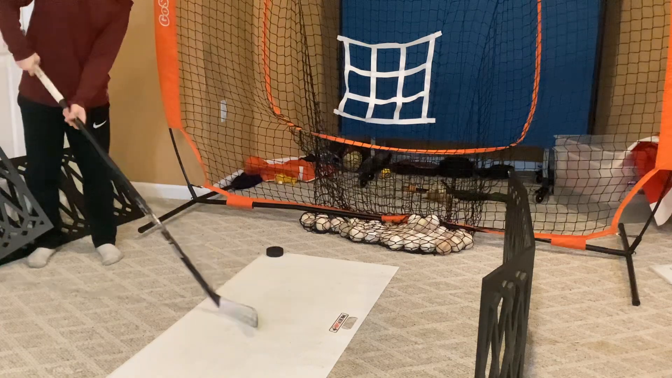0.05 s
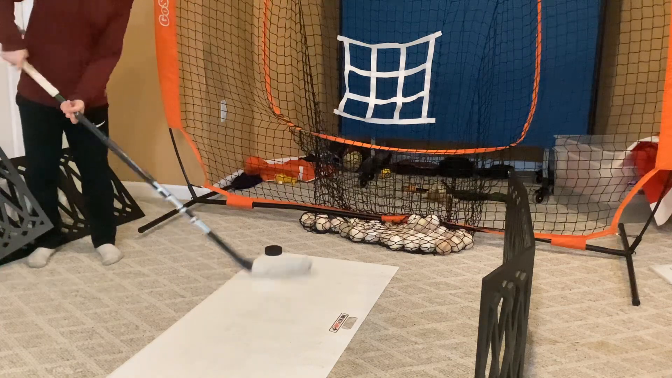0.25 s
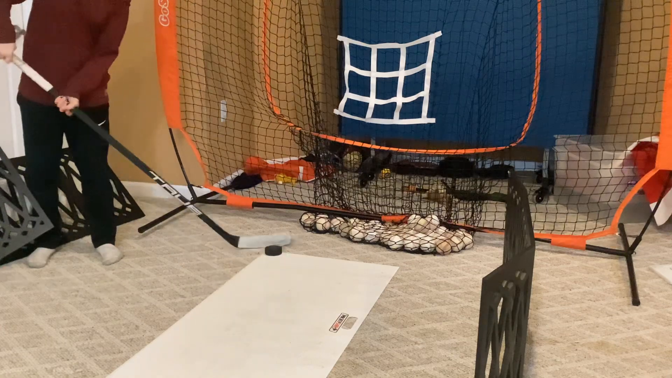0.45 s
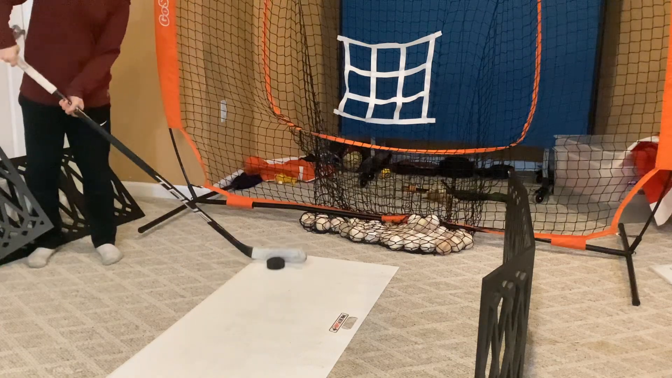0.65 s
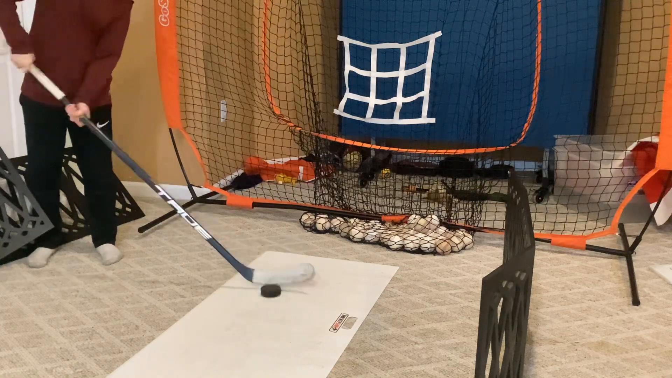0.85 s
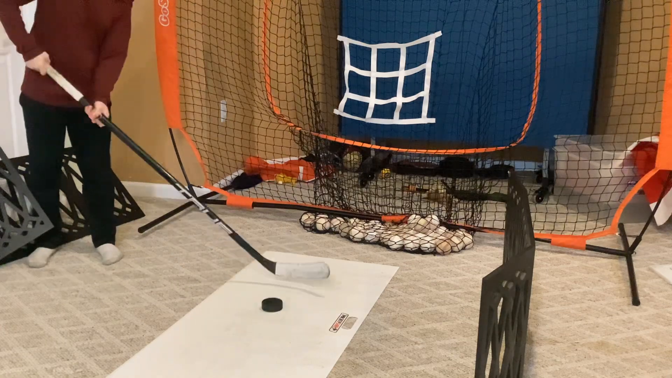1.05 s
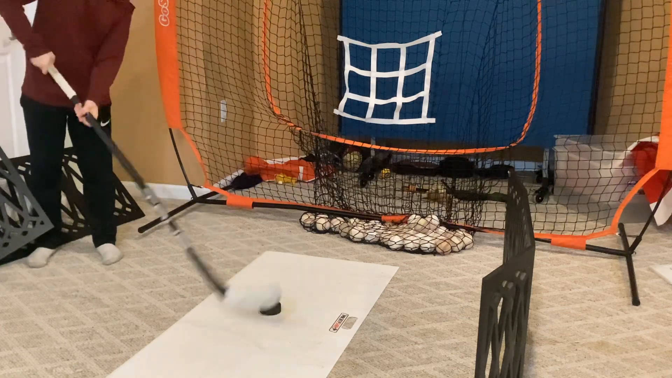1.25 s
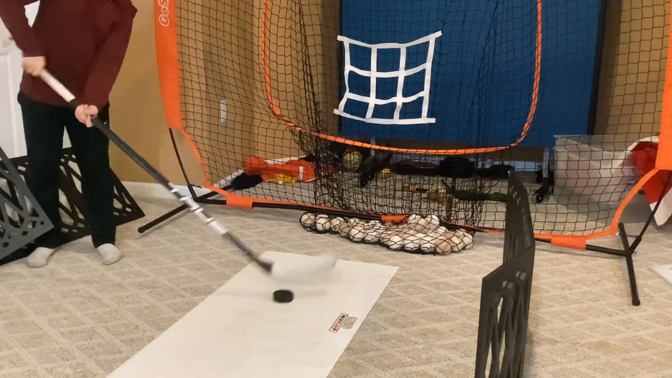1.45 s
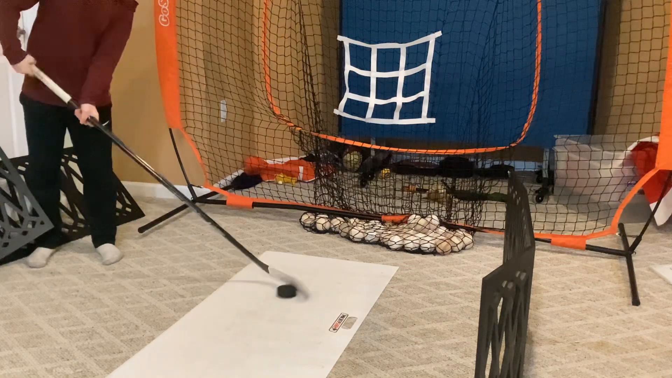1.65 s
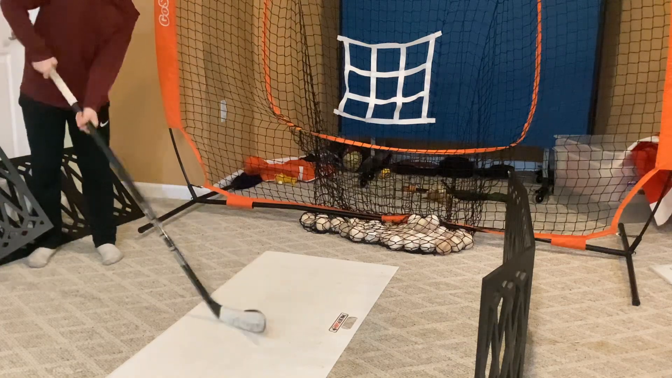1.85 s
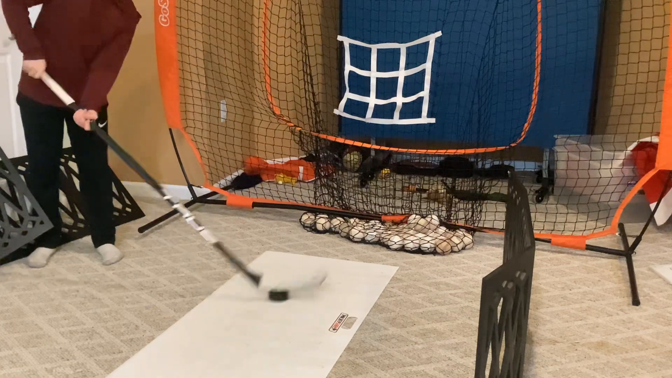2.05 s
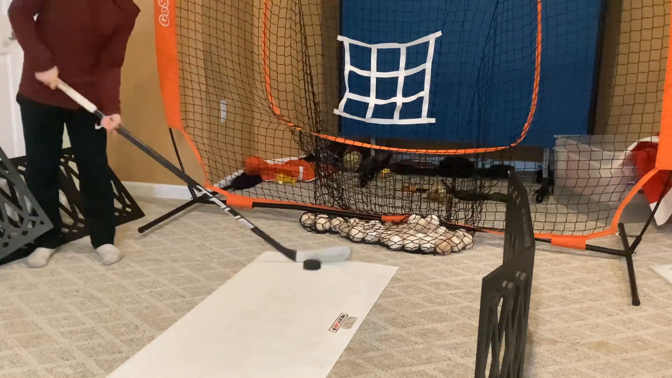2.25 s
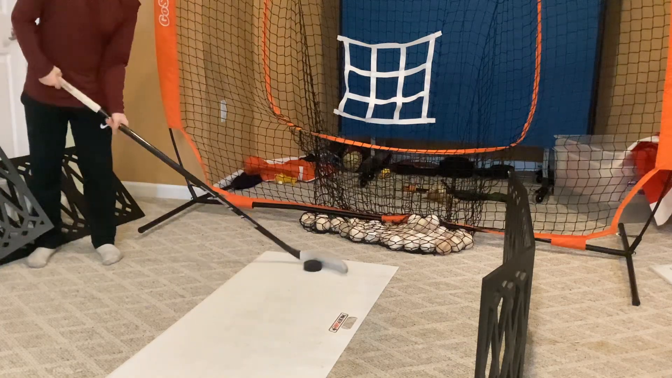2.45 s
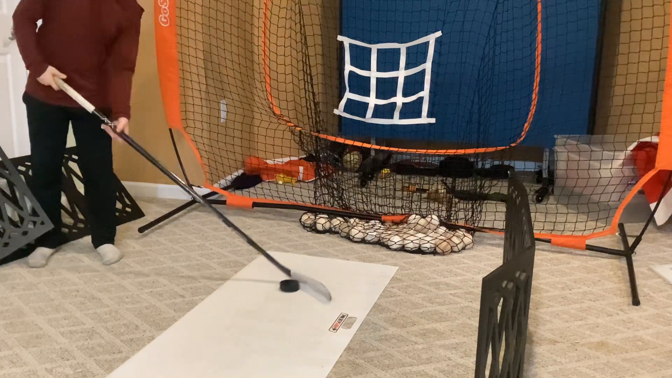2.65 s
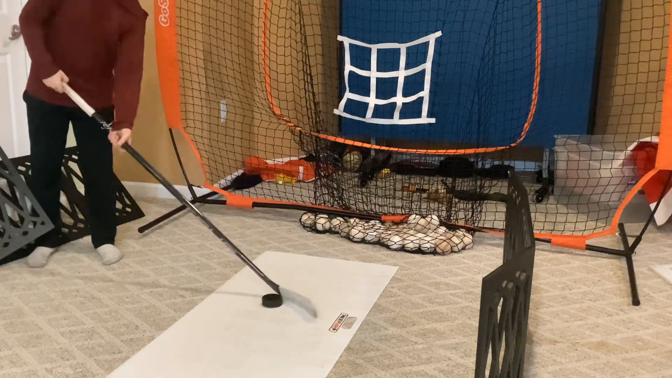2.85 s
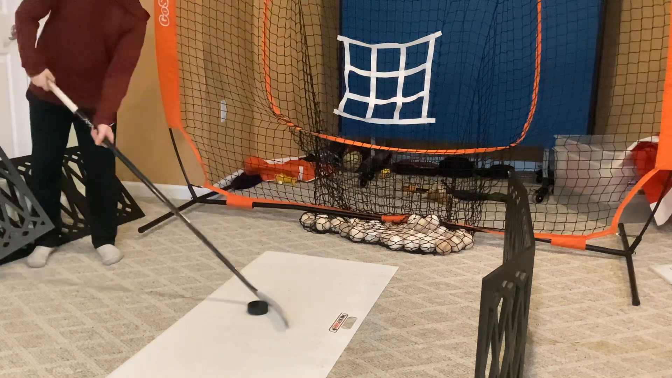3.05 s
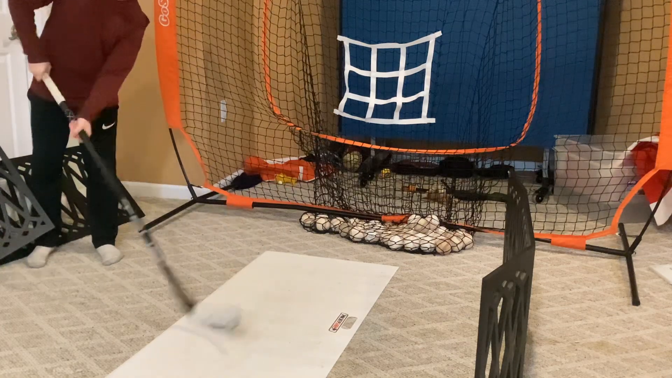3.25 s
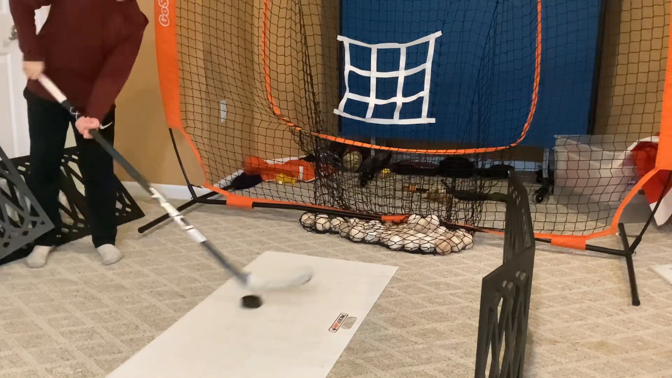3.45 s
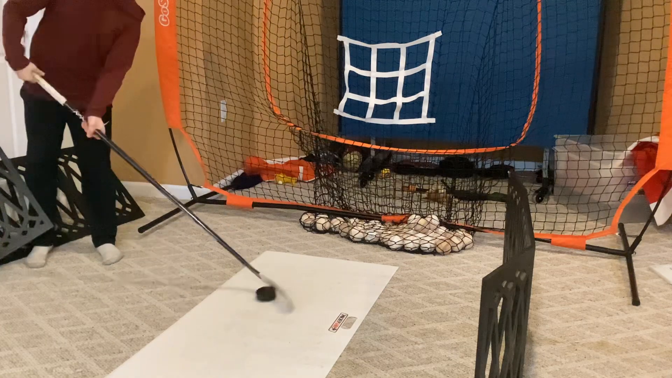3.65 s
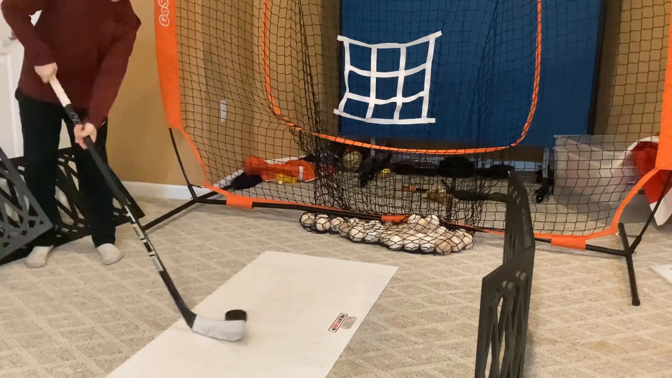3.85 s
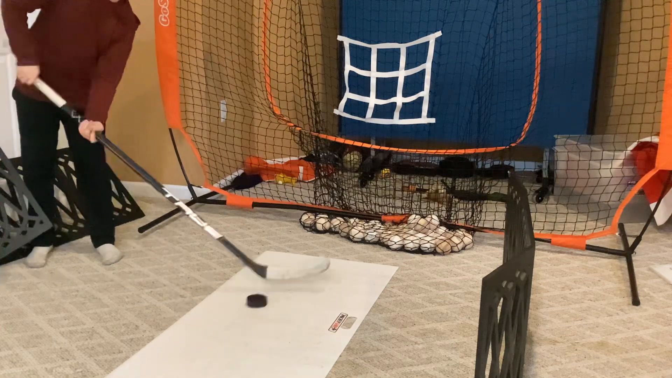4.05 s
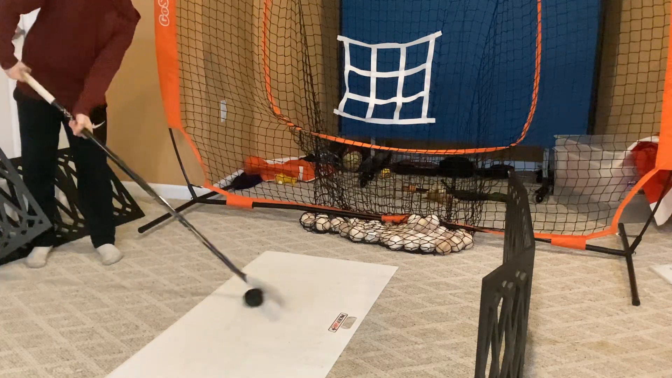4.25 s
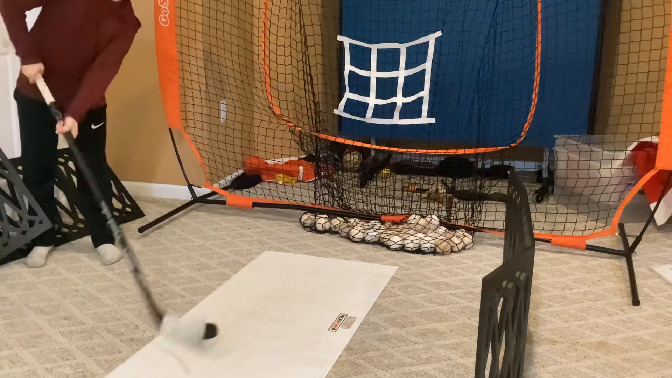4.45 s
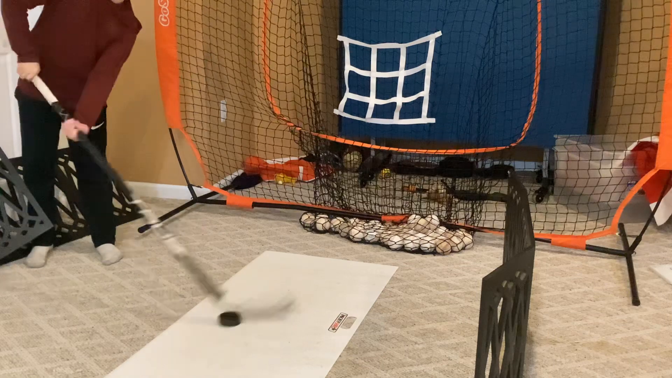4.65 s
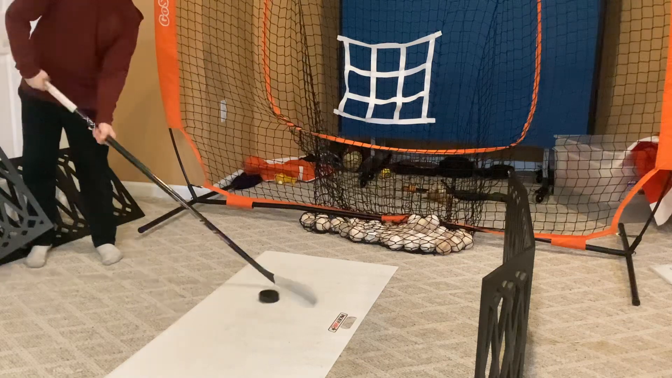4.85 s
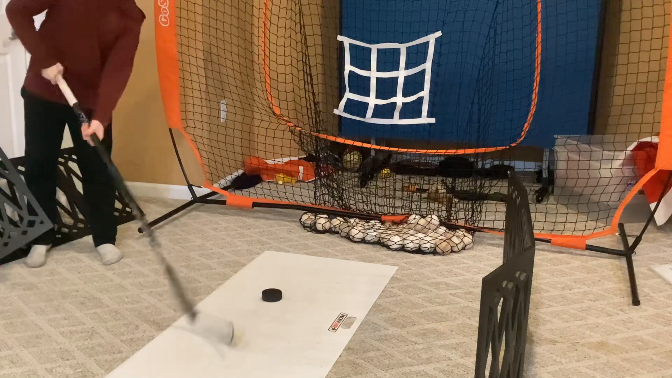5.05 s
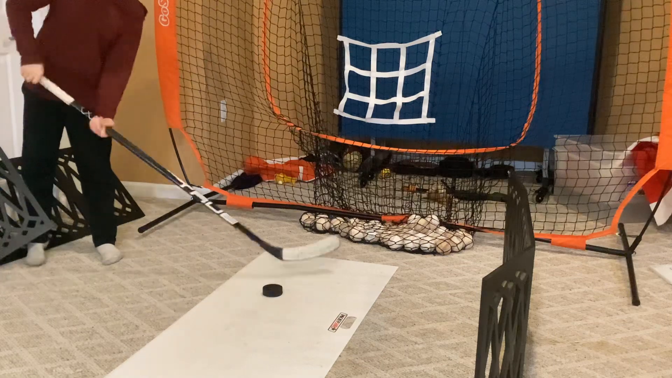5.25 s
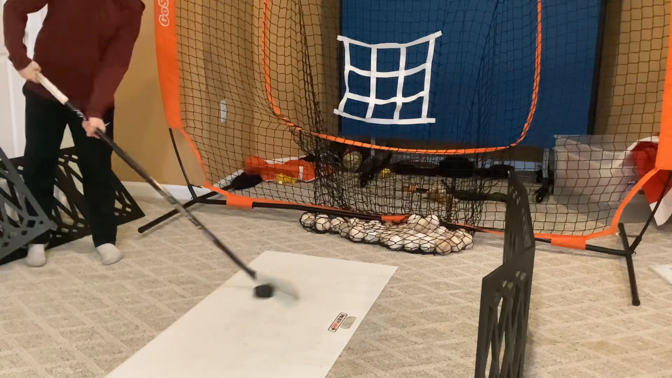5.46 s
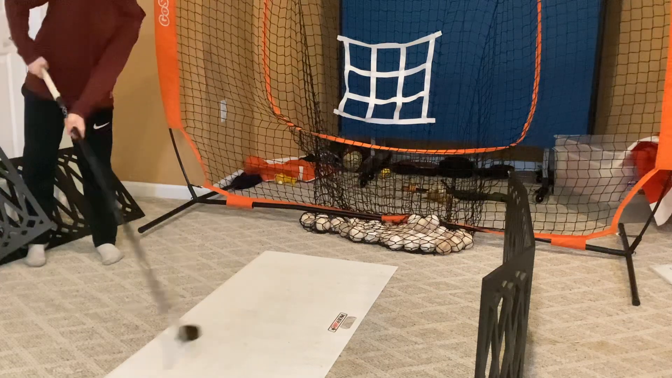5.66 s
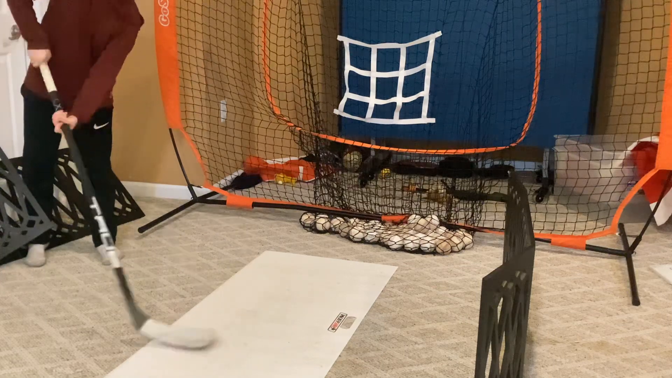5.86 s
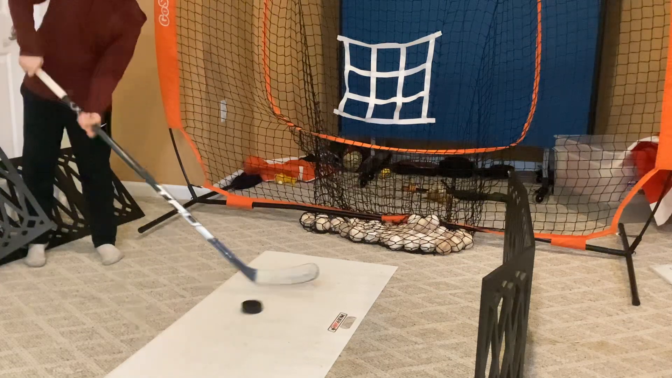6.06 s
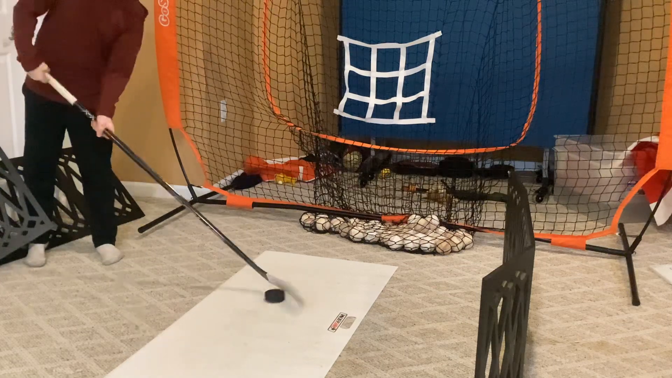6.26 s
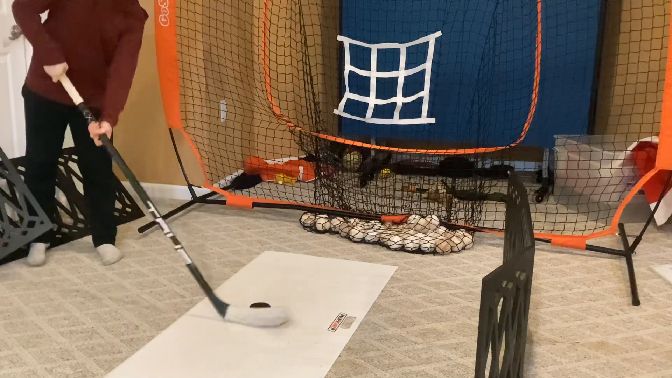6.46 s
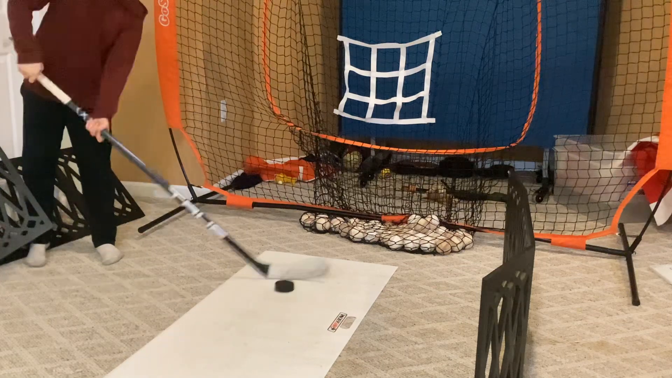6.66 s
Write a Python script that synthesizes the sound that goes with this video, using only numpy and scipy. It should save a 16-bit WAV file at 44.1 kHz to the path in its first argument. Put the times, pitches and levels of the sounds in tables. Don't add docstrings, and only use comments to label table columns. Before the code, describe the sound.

Hard, dry clacks of a stick blade on plastic alternate with woody knocks of a puck, each with a short low floor boom. The first second is sparse, a flurry follows, then a quieter stretch of scrapes and rasps, then fast irregular hitting until the end. Dull foot thuds on carpet and a very faint house hum sit behind, in a close, lively little room heard from two metres.

```python
import sys
import numpy as np
from scipy import signal
from scipy.fft import rfft, irfft, next_fast_len
from scipy.io import wavfile
from scipy.ndimage import uniform_filter1d

SR = 44100
rng = np.random.default_rng(int(sys.argv[2]) if len(sys.argv) > 2 else 0)


def materialize(psi):
    bounded = np.clip(np.atleast_2d(psi).T, -1, 1)
    quanta = np.round(bounded * 32767).astype(np.int16)
    wavfile.write(sys.argv[1], SR, quanta)


def convert_level_to_amplitude(level_db):
    exponent = np.asarray(level_db, float) / 20
    return 10 ** exponent


N = 295470

# [t/s, force/dB, edge level/dB, blade ring/dB, floor boom/dB]
HEEL_KNOCKS = [
    (1.42, -11.5, -18, -13, -25),
    (2.302, -11.5, -26, -23.5, -30.5),
    (5.217, -15, -26.5, -22, -20),
    (5.453, -5, -17, -16.5, -18),
    (6.517, -11, -25, -18, -20.5),
]
MIDDLE_KNOCKS = [
    (3.582, -1.5, -18.5, -15, -24),
    (4.201, -8, -18.5, -10.5, -20),
    (4.553, -14, -18.5, -15.5, -28),
    (6.242, -9, -15.5, -15, -19),
]
TOE_KNOCKS = [
    (0.537, -17.5, -31, -25, -38),
    (1.584, -6, -10.5, -5, -35),
    (3.366, -15, -21, -16.5, -22),
    (3.945, -10, -22, -21, -21),
    (4.918, -11.5, -22.5, -21, -21),
]
# [f/Hz, level/dB]
BLADE_EDGE = [(800, -52.5), (1800, 4.5), (2400, 5.5), (4400, 2.5), (5500, 3), (8000, 2.5), (11000, -4.5),
              (16000, -30.5)]


def evened(x):
    return x / np.sqrt(np.mean(x ** 2) + 1e-20)


def read(points, hz):
    f, value = np.transpose(points)
    return np.interp(np.log(hz + 1), np.log(f + 1), value)


def add(mix, s, sound):
    part = mix[round(s * SR):][:len(sound)]
    part += sound[:len(part)]


def colour(x, points):
    size = next_fast_len(N + SR)
    gain = convert_level_to_amplitude(read(points, np.fft.rfftfreq(size, 1 / SR)))
    return irfft(rfft(x, size) * gain, size)[..., :N]


def click(spectrum):
    log_gain = np.log(convert_level_to_amplitude(read(spectrum, abs(np.fft.fftfreq(2048, 1 / SR)))))
    pulse = np.fft.ifft(np.exp(np.conj(signal.hilbert(log_gain)))).real[:1024]
    return pulse / abs(pulse).max()


def ring(modes, hz_scale, rise_s, chance, spread_db=0, spread=0):
    t = np.arange(0, max(mode[2] for mode in modes), 1 / SR)
    tones = np.zeros(len(t))
    for (f, db, t60), c in zip(modes, chance):
        level_db = db + spread_db * (c * 7 % 1 - 0.5)
        hz = f * hz_scale * (1 + spread * (c * 13 % 1 - 0.5))
        tones += convert_level_to_amplitude(level_db - 60 * t / t60) * np.sin(2 * np.pi * (hz * t + c))
    return tones * (1 - np.exp(-t / rise_s)) ** 2


def noise(spectrum, patchy_db):
    hz = np.fft.rfftfreq(512, 1 / SR)
    a, b, patches = rng.standard_normal((N // 128 + 5, 257, 3)).T
    patches = uniform_filter1d(patches, size=8, axis=0)
    patches = evened(uniform_filter1d(patches, size=14, axis=1))
    z = (a + 1j * b) * convert_level_to_amplitude(read(spectrum, hz)[:, None] + patchy_db * patches)
    return evened(signal.istft(z, nperseg=512, noverlap=384)[1][:N])


def slap_blows():
    # [t/s, force/dB, trapped air/dB, floor boom/dB]
    flat_landings = [(0.137, -28, -41, -45), (0.934, -15, -22.5, -34), (1.345, -3, -8.5, -21.5),
                     (1.5555, -3, -8, -17.5), (1.881, -6, -11.5, -21.5), (2.195, -9, -14, -26.5),
                     (3.313, -8, -13.5, -22), (3.529, -5, -9.5, -19), (3.862, -9, -13.5, -21.5),
                     (4.124, -5.5, -8.5, -19), (4.516, -7.5, -12.5, -22), (4.789, -5.5, -9.5, -20.5),
                     (5.097, -8, -12.5, -22.5), (5.338, -6.5, -9, -21.5), (5.723, -8.5, -12, -27.5),
                     (6.119, -8, -10.5, -23), (6.428, -5, -7, -19.5), (6.691, -1.5, -7.5, -19)]
    # [f/Hz, level/dB, t60/s]
    contact = [(45, -14, 0.041), (565, 2.5, 0.014), (1180, -25.5, 0.023), (2153, 9.5, 0.0037)]
    flat_hz = 1055
    rows = [(s, db, (db + air) / 2 - 10.5, air, db, boom, flat_hz) for s, db, air, boom in flat_landings]
    return blows(rows, contact, BLADE_EDGE, contact_s=0.00005, squeeze_s=0.0001,
                 click_db=-16.0, body_db=-3.5, edge_db=17, snap_db=-12.5, air_db=20, spill_db=15.0,
                 blade_db=-21.5, boom_db=-1.0, boom_rise_s=0.0026)


def knock_blows():
    # [t/s, edge level/dB, blade ring/dB, floor boom/dB]
    brushes = [(0.399, -41, -38, -80), (0.445, -49, -52, -43.5), (0.721, -58, -39, -50),
               (0.775, -54, -43, -33), (0.796, -39, -31.5, -30.5), (2.403, -42, -67, -86),
               (2.463, -45, -44, -46), (2.476, -35.5, -51, -57), (2.518, -38.5, -62, -62),
               (2.588, -41.5, -48, -46), (2.775, -79, -42, -73), (4.169, -38, -32, -28),
               (4.434, -49, -41, -32), (5.165, -69, -30, -50), (6.29, -36, -36, -27.5)]
    # [f/Hz, level/dB, t60/s]
    contact = [(694, -4.5, 0.0045), (1204, -0.5, 0.0084), (2370, 4, 0.0046), (3340, -2.5, 0.0042),
               (5140, -8, 0.0026)]
    # [f/Hz, level/dB]
    puck_edge = [(800, -62), (1800, 4), (2400, 7), (4400, 1), (5800, -3), (7000, -3.5), (11000, -6.5),
                 (16000, -49)]
    rows = [(s, db, edge, edge, blade, boom, hz)
            for knocks, hz in ((HEEL_KNOCKS, 770), (MIDDLE_KNOCKS, 939), (TOE_KNOCKS, 1186))
            for s, db, edge, blade, boom in knocks]
    brush_click_db, brush_hz = 7, 1076
    rows += [(s, edge + brush_click_db, edge, edge, blade, boom, brush_hz) for s, edge, blade, boom in brushes]
    return blows(sorted(rows), contact, puck_edge, contact_s=0.00012, squeeze_s=0.0001,
                 click_db=3.5, body_db=2.5, edge_db=8.5, snap_db=-5.5, air_db=-8, spill_db=-20.0,
                 blade_db=-6.5, boom_db=-9.0, boom_rise_s=0.0021)


def blows(rows, contact, bite, contact_s, squeeze_s, click_db, body_db, edge_db, snap_db, air_db, spill_db,
          blade_db, boom_db, boom_rise_s):
    # [f/pitch, level/dB, t60/s]
    blade_modes = [(.56, -13, .03), (.78, -9, .035), (.88, -7, .04), (.95, -6, .035), (1.03, -5, .045),
                   (1.12, -7, .035), (2.2, -12, .02)]
    # [f/Hz, level/dB, t60/s]
    floor_modes = [(73.5, -19.5, 0.26), (129.7, -2.5, 0.18), (181, -2.5, 0.23), (224.2, 4.5, 0.12),
                   (249.6, 3.5, 0.11), (350, -4.5, 0.18), (421, -8, 0.23), (474, -11.5, 0.28),
                   (595.5, -11, 0.33)]
    # [f/Hz, level/dB]
    jet_toward_mic = [(3000, -51.5), (7000, -16), (10000, -17), (13000, 0.5), (15000, 2), (17000, -4.5)]
    # [f/Hz, level/dB]
    jet_into_room = [(3000, -45), (7000, -1), (9500, -1.5), (12000, -1), (14000, -4.5), (16000, -5)]
    # [f/Hz, level/dB]
    stick_body = [(150, -32.5), (350, -1), (700, 2), (1200, 1.5), (1550, -1.5), (2300, -8.5), (3200, -15),
                  (6000, -50)]
    places, straight = np.zeros((4, N)), np.zeros(N)
    chance = rng.random((len(rows), 16))
    lead = 88
    puffs, t = rng.standard_normal((len(rows), 2 * lead)), (np.arange(2 * lead) - lead) / SR
    squeeze = np.exp(np.where(t < 0, t / squeeze_s, -t / 0.00019))
    body, edge, air, spill = click(stick_body), click(bite), click(jet_toward_mic), click(jet_into_room)
    for k, (s, db, e_db, a_db, r_db, b_db, hz) in enumerate(rows):
        hit, place = s + 0.00092, places[k % len(places)]

        puff = puffs[k] * squeeze
        jet = np.convolve(puff / np.linalg.norm(puff), air)
        jet_db = a_db + air_db + 0.83 * (a_db + 27.5)
        add(straight, hit - lead / SR, convert_level_to_amplitude(jet_db) * jet)
        touch = ring(contact, 0.99, contact_s, 0.28 * chance[k, 2:], spread_db=-2.0, spread=0.53)
        add(straight, hit, convert_level_to_amplitude(db + click_db) * touch)
        add(straight, hit, convert_level_to_amplitude(e_db + edge_db + snap_db) * edge)

        add(place, hit, convert_level_to_amplitude(a_db + spill_db) * spill)
        add(place, hit, convert_level_to_amplitude((db + r_db) / 2 + body_db) * body)
        add(place, hit, convert_level_to_amplitude(e_db + edge_db) * edge)
        add(place, hit, convert_level_to_amplitude(r_db + blade_db) * ring(blade_modes, hz, 0.00065, chance[k], spread_db=6))

        boom = ring(floor_modes, 0.98, boom_rise_s, 0.14 * chance[k, 6:], spread_db=6.5, spread=0.074)
        boom *= convert_level_to_amplitude(b_db + boom_db)
        add(straight, hit, boom)
        add(place, hit, convert_level_to_amplitude(-12) * boom)
    return places, straight


def friction():
    # [start t/s, length/s, speed level/dB, pressure level/dB]
    strokes = [(0.0, 0.0092, -53, 4.5), (0.466, 0.085, -70.5, 14), (0.534, 0.12, -58.5, 4.5),
               (0.694, 0.11, -61, 1.5), (0.803, .1, -53.5, -7), (0.97, 0.16, -69.5, 4.5),
               (1.47, 0.16, -61, 6), (1.737, 0.15, -56.5, 1.5), (1.943, 0.23, -51.5, -3.5),
               (2.435, 0.053, -67, 12), (2.468, 0.23, -52, 1), (2.736, 0.16, -57.5, -1),
               (2.875, 0.16, -62, 6.5), (3.108, 0.25, -62.5, 1.5), (3.396, 0.14, -52.5, 0),
               (3.708, 0.24, -61.5, 5.5), (3.904, 0.17, -54, -11), (4.086, 0.14, -61, 0),
               (4.38, 0.17, -59, 2.5), (4.56, 0.11, -53.5, -10), (4.703, 0.13, -57, 0),
               (5.15, 0.33, -66, 14), (5.384, 0.35, -53, -2), (5.764, 0.063, -59, 11),
               (5.905, 0.11, -53, -2.5), (6.048, .1, -57.5, 1), (6.19, 0.051, -45, -4),
               (6.33, .1, -61.5, 6), (6.48, 0.18, -56.5, -2)]
    rise_db_per_s, fall_db_per_s = 394, 182
    skid_db, skid_t60_s = -32.5, 0.47
    t = np.arange(0, N / SR + 0.01, 0.004)
    start, length, speed_db, press_db = np.transpose(strokes)[:, :, None]
    before, after = np.maximum(start - t, 0), np.maximum(t - start - length, 0)
    shape_db = speed_db - rise_db_per_s * before - fall_db_per_s * after
    s, force_db = np.transpose(HEEL_KNOCKS + MIDDLE_KNOCKS + TOE_KNOCKS)[:2, :, None]
    skid = (convert_level_to_amplitude(2 * (force_db + skid_db - 60 * (t - s) / skid_t60_s)) * (t > s)).sum(0)
    levels = []
    for share in (0, 1, 1):
        power = convert_level_to_amplitude(2 * (shape_db + share * press_db)).sum(0) + (share > 0) * skid
        level_db = np.minimum(10 * np.log10(power + 1e-10), -49)
        levels.append(np.interp(np.arange(N) / SR, t, level_db))
    return levels


def slide():
    # [f/Hz, level/dB]
    hiss_colour = [(1000, -27), (4000, -9), (8000, -5.5), (11000, 1), (16000, 10)]
    # [f/Hz, level/dB]
    scrape_colour = [(500, -9.5), (1200, 5), (2500, 6), (6000, -12.5), (10000, -15.5), (16000, -77)]
    # [f/Hz, level/dB]
    drag_colour = [(60, -34), (130, -8.5), (250, 12), (1000, 3), (2000, 2), (5000, -37)]
    hiss_db, scrape_db, drag_db = friction()
    slip = evened(uniform_filter1d(rng.standard_normal(N), size=200))
    patchy_db = 2.4
    hiss = convert_level_to_amplitude(hiss_db + 16 + 1.0 * slip) * noise(hiss_colour, patchy_db)
    scrape = convert_level_to_amplitude(scrape_db + 2.3 * slip) * noise(scrape_colour, patchy_db)
    drag = convert_level_to_amplitude(drag_db - 1.5 + 0.82 * slip) * noise(drag_colour, patchy_db)
    return hiss + scrape + drag


def ticks():
    level_db = friction()[1]
    per_s, spread_db = 90, 4.5
    size = convert_level_to_amplitude(spread_db * np.minimum(rng.exponential(1, N), 3))
    grit = size * (rng.random(N) < per_s / SR)
    return signal.oaconvolve(convert_level_to_amplitude(level_db + 5) * grit, click(BLADE_EDGE))[:N]


def scuffs():
    # [t/s, level/dB, length/s]
    grazes = [
        (0.441, -43, 0.0093),
        (0.533, -37, .005),
        (2.404, -36, 0.0053),
        (4.365, -33, 0.0062),
        (4.427, -50, .006),
        (5.157, -24.5, 0.0094),
    ]
    # [f/Hz, level/dB]
    graze_colour = [(500, 1), (2000, -1), (6000, -8), (9000, -4), (13000, -8), (16000, 11)]
    out, t = np.zeros(N), np.arange(SR // 10) / SR
    for (s, db, length), rub in zip(grazes, rng.standard_normal((len(grazes), len(t)))):
        puff = evened(np.convolve(rub, click(graze_colour))[:len(t)])
        swell = 2 * t / length * np.exp(1 - 2 * t / length)
        add(out, s, convert_level_to_amplitude(db) * puff * swell)
    return out


def rasps():
    # [t/s, level/dB, centre f/Hz]
    catches = [
        (0.619, -47, 1140),
        (1.2394, -64.5, 2750),
        (2.587, -40, 1960),
        (2.722, -42, 2820),
        (2.7732, -36, 2020),
        (2.8294, -50, 2220),
    ]
    out, t = np.zeros(N), np.arange(SR // 5) / SR
    for (s, db, hz), rub in zip(catches, rng.standard_normal((len(catches), len(t)))):
        band = signal.lfilter(*signal.butter(2, [0.69 * hz, 1.14 * hz], "band", fs=SR), rub)
        swell = 1 - np.exp(-t / 0.008)
        add(out, s, convert_level_to_amplitude(db - 2.5 - 60 * t / 0.5) * evened(band) * swell)
    return out


def thuds():
    # [t/s, level/dB, pitch f/Hz]
    landings = [(0.099, -41, 62), (0.791, -64, 208), (2.894, -38, 76), (2.998, -49.5, 164),
                (3.031, -47, 251), (3.47, -26.5, 234.3), (3.744, -35.5, 240), (3.794, -28.5, 233),
                (4.373, -29, 181), (4.399, -32.5, 350), (4.434, -33, 226), (6.389, -36, 221)]
    carpet = [(1, 0, 0.09), (0.8, -5, 0.12), (1.2, -6, 0.07), (1.75, -11, 0.05)]  # [f/pitch, level/dB, t60/s]
    out = np.zeros(N)
    for s, db, hz in landings:
        add(out, s, convert_level_to_amplitude(db - 1.5) * ring(carpet, hz, 0.0056, [0.015, 0.21, 0.54, 0.1]))
    return out


def room(places, tail_db):
    # [t/s, level/dB]
    wall_echoes = [(.0032, -17.5), (.0055, -6.5), (.0092, -15.5), (0.0111, -5.5), (0.014, -5.5),
                   (.0185, -5.5), (0.0251, -19.5)]
    # [f/Hz, t60/s]
    decay = [(60, 0.058), (160, 0.53), (420, 0.25), (1100, 0.35), (2900, 0.3), (7700, 0.3), (14000, 0.37)]
    out = places.sum(0)
    for x in places:
        taps = np.zeros(SR)
        at = np.arange(30, SR - 20, 12)
        taps[at + rng.integers(0, 12, len(at))] = rng.choice([-1., 1.], len(at))
        hz, t, z = signal.stft(taps, SR, nperseg=256)
        tail = signal.istft(z * convert_level_to_amplitude(-60 * t / read(decay, hz)[:, None]), SR, nperseg=256)[1]
        build_up = 1 - np.exp(-np.arange(len(tail)) / SR / 0.001)
        tail *= convert_level_to_amplitude(tail_db) / np.linalg.norm(tail) * build_up
        for (s, db), shifts in zip(wall_echoes, rng.uniform(-1, 1, (len(wall_echoes), 3))):
            at = np.round((s + 0.0008 * shifts) * SR).astype(int)
            tail[at] += convert_level_to_amplitude(db - 5.0) * np.array([1, -1, 1])
        out += signal.oaconvolve(x, tail)[:N]
    return out


def house_hum():
    # [f/Hz, level/dB per Hz]
    hum_colour = [(18, -52), (30, 0), (103, -10.5), (170, -13.5), (364, -24.5), (1200, -28), (2750, -36),
                  (4080, -63)]
    return convert_level_to_amplitude(-65) * noise(hum_colour, patchy_db=-1.0)


def scene():
    # [f/Hz, level/dB]
    dull_treble = [(15000, 0), (15700, -10), (15950, -60)]
    slap, slap_straight = slap_blows()
    knock, knock_straight = knock_blows()
    places = slap + knock
    places[0] += ticks() + convert_level_to_amplitude(-8.0) * thuds()
    places[1] += scuffs()
    around = room(places, tail_db=4.5) + thuds() + slide() + rasps() + house_hum()
    return (slap_straight + knock_straight + colour(around, dull_treble))[None]


def low_pass(x):
    return signal.sosfilt(signal.butter(12, 17010, fs=SR, output="sos"), x)


def record(dry):
    # [f/Hz, level/dB]
    mic_colour = [(100, 3.5), (1250, -1), (1400, -5), (5500, 1.5), (8500, 1), (10500, 0.5), (11500, 4),
                  (15500, -7.5)]
    # [f/Hz, level/dB]
    band_steps = [(5800, 0), (6130, 1), (6210, -5), (15500, -5), (16850, -12), (17050, -90)]
    heard = signal.lfilter(*signal.butter(3, 62, "high", fs=SR), dry)
    for lag_hz in (700, 230):
        pole = [1, -np.exp(-2 * np.pi * lag_hz / SR)]
        poles = np.convolve(pole, pole)
        heard = signal.lfilter(poles[::-1], poles, heard)
    heard = colour(heard, mic_colour)
    held = heard / (1 + heard ** 4) ** 0.25
    return low_pass(colour(held, band_steps))


dry = scene()
out = record(dry)
materialize(out)
```